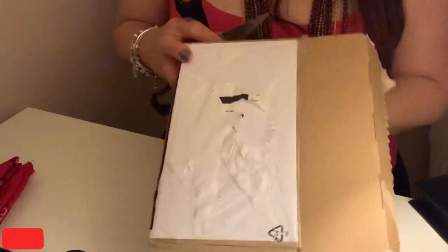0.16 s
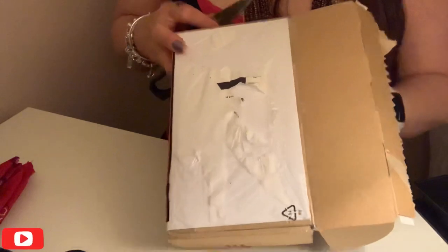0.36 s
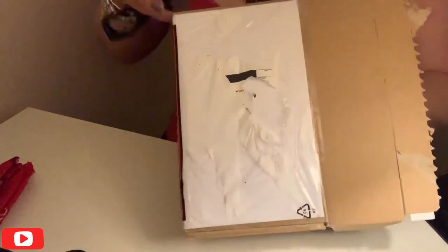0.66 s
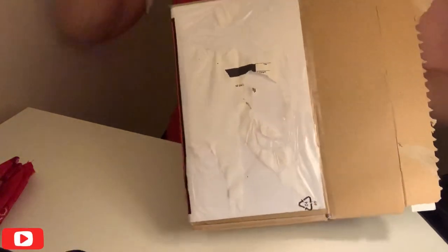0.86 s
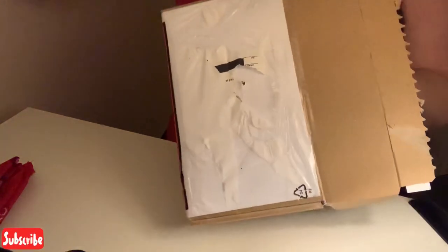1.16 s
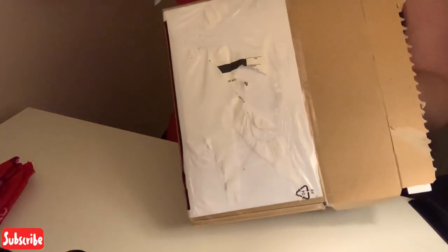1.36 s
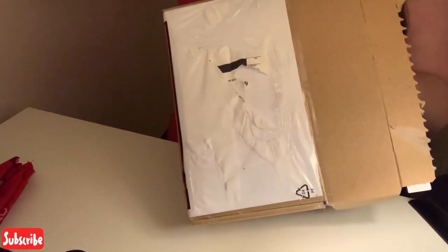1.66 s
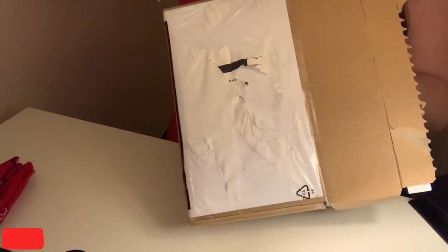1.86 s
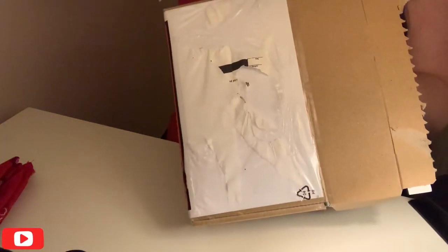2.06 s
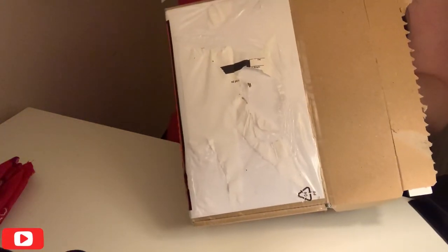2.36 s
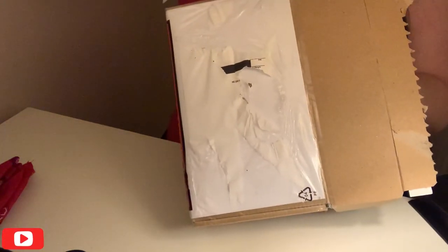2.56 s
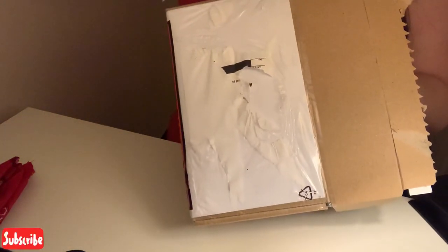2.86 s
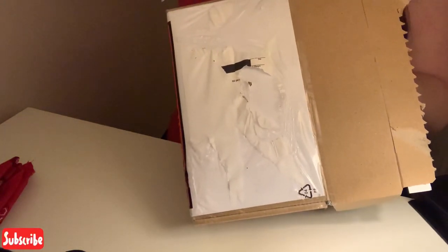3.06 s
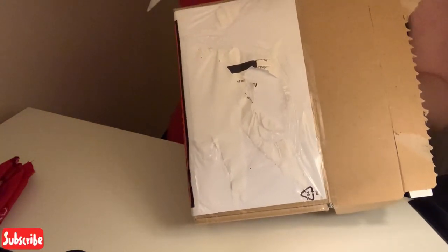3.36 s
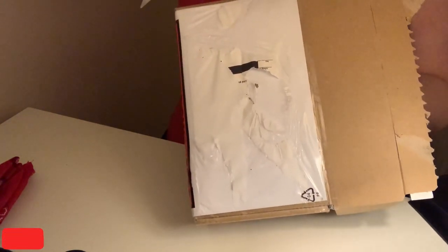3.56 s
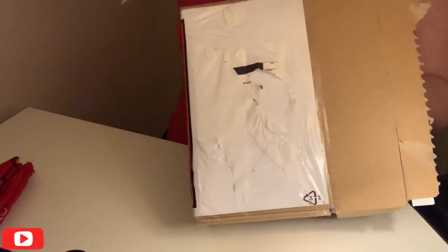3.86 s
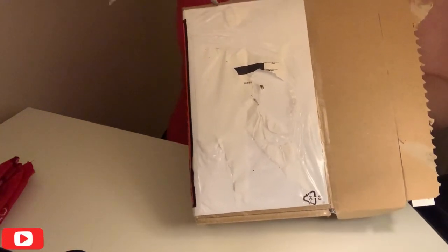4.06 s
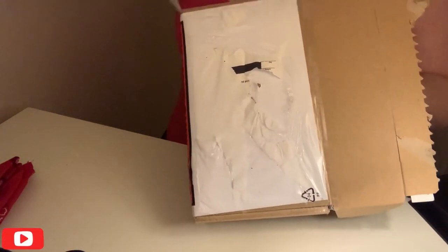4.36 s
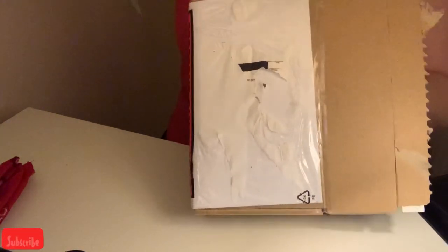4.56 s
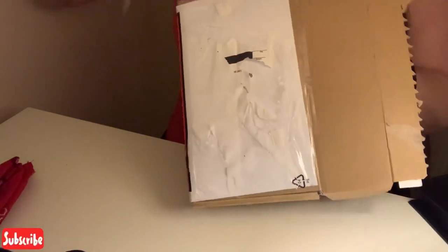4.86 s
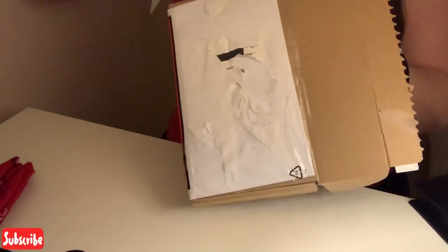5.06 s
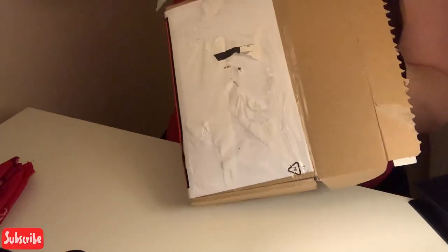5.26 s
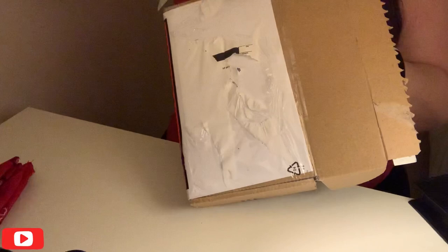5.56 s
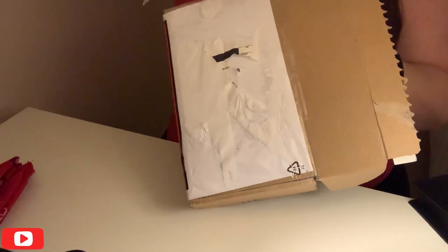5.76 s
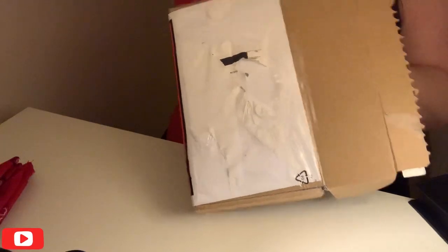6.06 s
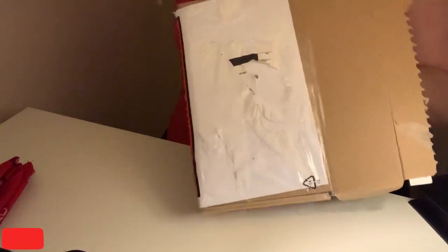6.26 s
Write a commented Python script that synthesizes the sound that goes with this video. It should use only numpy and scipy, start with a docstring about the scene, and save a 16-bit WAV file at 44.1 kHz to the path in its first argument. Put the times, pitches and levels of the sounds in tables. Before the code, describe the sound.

Close-up cardboard handling in a small, quiet room. A knock and dry scrapes open, the lid thuds softly, then the box is held nearly still with one tiny clink. A sudden hard tug brings deep hollow bumps and bright snaps, easing into a creaky run of ticks. After a short lull, a second pull thumps, rasps and crackles, then fades.

```python
"""A tight-fitting packet is worked loose in a torn-open cardboard mailer over a table in a small room.
First the box is turned: it knocks, scrapes, and its lid thuds; then it is held, almost still, with one clink.
A first hard pull bumps the walls and snaps creases; as it eases off, a fold creaks in a run of ticks.
After a new grip comes a second pull, which dies away. Slips and blows ring decaying sines; scrapes, crackle
and snaps are shaped noise. Two close microphones, a little to one side, hear it with the room and its air."""
import sys
import numpy as np
from scipy import signal
from scipy.fft import rfft, irfft, next_fast_len
from scipy.io import wavfile
from scipy.ndimage import uniform_filter1d, map_coordinates

SR = 44100
rng = np.random.default_rng(int(sys.argv[2]) if len(sys.argv) > 2 else 0)


def file_out(sig):
    """Save sig as 16-bit WAV at sys.argv[1]."""
    # one column per channel
    cols = np.atleast_2d(sig).T
    # limit, then scale
    lim = np.clip(cols, -1, 1)
    pcm = np.round(lim * 32767).astype(np.int16)
    wavfile.write(sys.argv[1], SR, pcm)


N = 281952
TIME = np.arange(N) / SR


def undb(db):
    """Decibels to gain."""
    return 10 ** (np.asarray(db) / 20)


def unit(x):
    """Scale to an rms of 1."""
    return x / np.sqrt(np.mean(x ** 2))


def unit_hit(x, size=220):
    """Scale a hit so that its loudest few milliseconds have an rms of 1."""
    return x / np.sqrt(uniform_filter1d(x ** 2, size).max())


def gains(points, hz):
    """Read (frequency [Hz], level [dB]) points as gains on a log-frequency axis."""
    f, db = np.transpose(points)
    return undb(np.interp(np.log(hz + 1), np.log(f), db))


def colour(x, points):
    """Causal filter with the given spectrum: folding the cepstrum forward makes it minimum-phase."""
    n = 2 * next_fast_len(x.shape[-1])
    cepstrum = irfft(np.log(gains(points, np.fft.rfftfreq(n, 1 / SR))))
    cepstrum[1:n // 2] *= 2
    cepstrum[n // 2 + 1:] = 0
    response = np.exp(rfft(cepstrum))
    return irfft(rfft(x, n) * response)[..., :x.shape[-1]]


def fade(t60, size):
    """Exponential decay that loses 60 dB in t60 seconds."""
    return np.exp(-np.log(1000) * TIME[:size] / t60)


def ring(modes, detune=1, size=22050):
    """One decaying sine for each mode, as rows; neighbouring modes swing opposite ways."""
    hz, db, t60 = np.transpose(modes)[:, :, None]
    held_t60 = np.minimum(t60, .26)  # no mode rings longer than this
    sign = (-1) ** np.arange(len(modes))[:, None]
    swing = np.sin(2 * np.pi * hz * detune * TIME[:size])
    return sign * undb(db) * fade(held_t60, size) * swing


def convolve(x, response):
    """Pass a sound through an impulse response."""
    return signal.fftconvolve(x, response)[:N]


def add(track, s, sound):
    """Mix a sound into a track at a time."""
    start = max(int(s * SR), 0)
    track[start:start + len(sound)] += sound[:N - start]


def grains(rate, spread_db):
    """Randomly timed impulses, many small and a few large."""
    hits = rng.random(N) < rate / SR
    return hits * undb(spread_db * np.minimum(rng.standard_exponential(N), np.pi))


def steady(x, seconds):
    """Even out the slow swells of a texture and keep its grain."""
    local_power = np.abs(uniform_filter1d(x ** 2, int(seconds * SR)))
    floor = np.mean(x ** 2) / 10 ** 2  # keeps silent gaps from being blown up
    return x / np.sqrt(local_power + floor)


def diffuse(size, spacing_s=0.0013):
    """Noise from all sides at two microphones: alike in the bass, unrelated in the treble."""
    likeness = np.sinc(2 * spacing_s * np.fft.rfftfreq(size, 1 / SR)) * .9
    shares = np.sqrt([(1 + likeness) / 2, (1 - likeness) / 2])
    mid, side = rfft(rng.standard_normal((2, size))) * shares
    return irfft([mid + side, mid - side], size)


def radiate(x, corner_hz=58):
    """An open box pushes almost no air below its lowest mode."""
    return signal.sosfilt(signal.butter(4, corner_hz, "high", fs=SR, output="sos"), x)


def burst(noise, decay_s):
    """A short spray of breaking fibres: fading noise, flattened to an even spectrum and faded again."""
    spectrum = rfft(noise * fade(decay_s, len(noise)))
    return irfft(spectrum / np.abs(spectrum)) * fade(2 * decay_s, len(noise))


# colour of the still air: (frequency [Hz], relative density [dB])
AIR = [(15, -38), (25, -8.5), (64, 2.5), (137, -5.5), (641, -18.5), (911, -18.5), (2480, -34.5),
       (5430, -37), (8360, -33), (9570, -44.5), (11300, -30.5), (16000, -71)]
AIR_DB = -66


def still_air():
    """The quiet noise floor of the room, arriving from all sides."""
    return undb(AIR_DB) * unit(colour(diffuse(N), AIR))


# room sound against direct sound: (frequency [Hz], level [dB])
ROOM = [(60, -18.5), (200, -13), (400, -7.5), (800, -6), (3000, 0.5), (5500, -4.5), (8000, -8),
        (16000, -12.5)]


def room(x, t60=0.22, build_s=0.00043, size=22050):
    """Dense reflections from the table and the near walls, built up quickly and dying away."""
    onset = 1 - np.exp(-(TIME[:size] / build_s) ** 2)
    tail = diffuse(size) * fade(t60, size) * onset
    tail = colour(unit(tail) / np.sqrt(size), ROOM)
    return np.array([convolve(x, side) for side in tail])


def arrive(x, edge_hz=1500):
    """The whole box radiates lows from nearly ahead; highs leave its open side and reach the left later."""
    hz = np.fft.rfftfreq(N, 1 / SR)
    highs = 1 - 1 / (1 + (hz / edge_hz) ** 4)
    lag_s = .00005 + .000217 * highs
    left = irfft(rfft(x) * np.exp(-2j * np.pi * hz * lag_s), N)
    return np.array([left, x])


# colour of the clink: (frequency [Hz], relative density [dB])
CLINK = [(1000, -23), (3500, -29), (5800, -9), (7000, -2.5), (8300, 2), (9800, -3), (11200, -5),
         (13000, -15), (16000, -25)]
CLINK_S, CLINK_DB = 1.727, -39


def clink(size=2048):
    """A thin, dry tick, as of a small hard object being touched: one coloured burst of noise."""
    out = np.zeros(N)
    tick = colour(burst(rng.standard_normal(size), decay_s=0.036), CLINK)
    add(out, CLINK_S, undb(CLINK_DB) * unit_hit(tick))
    return out


# soft, deep thuds of the wide lid: (time [s], level [dB])
FLEXES = [(0.477, -30.5), (0.633, -37)]
FLEX_HZ, FLEX_T60_S = 71.6, 0.22


def flexes(size=22050):
    """The lid flexes as the box is turned: one low, decaying sine for each thud."""
    out = np.zeros(N)
    swing = np.sin(2 * np.pi * FLEX_HZ * TIME[:size]) * fade(FLEX_T60_S, size)
    for s, db in FLEXES:
        add(out, s, undb(db) * unit_hit(swing))
    return out


# slips of the creaking fold: time [s]
CREAKS = [4.776, 4.802, 4.822, 4.838, 4.859, 4.879, 4.905, 4.948, 4.976, 5.007, 5.034]
# modes of the creaking fold: (frequency [Hz], level [dB], t60 before the cap in ring() [s])
FOLD = [(314, -5, 0.28), (374.6, -1.5, 0.18), (408, 14, 0.037), (532, -5.5, 0.18), (617, -3, 0.053),
        (770, 0, 0.041), (967, 11, 0.02), (1220, 7.5, 0.021), (1680, 8.5, 0.0087), (1870, -21, 0.069),
        (2190, -13, 0.025), (2660, -12, 0.011), (3110, -7, 0.013), (3900, -17, 0.008), (4630, -12, 0.026)]
# level at full strain, how far below it the first slip starts [dB]; time constant of the build-up [s]
CREAK_DB, CREAK_SLACK_DB, CREAK_BUILD_S = -36, -9.5, 0.038


def creak():
    """A strained fold slips in a run of ticks on the same panel, louder as the strain builds."""
    out = np.zeros(N)
    for s, chance in zip(CREAKS, rng.standard_normal(len(CREAKS))):
        slack = np.exp((CREAKS[0] - s) / CREAK_BUILD_S)
        db = CREAK_DB + CREAK_SLACK_DB * slack
        tick = radiate(ring(FOLD, detune=1 + 0.044 * chance).sum(axis=0), corner_hz=201)
        add(out, s, undb(db) * unit_hit(tick))
    return out


# snaps of creases and edges: (time [s], bright snap level [dB], dull crack level [dB], decay setting [s])
SNAPS = [(0.0094, -50.5, -30.5, 0.019), (0.2852, -59, -46.5, .05), (0.4293, -50, -46, .034),
         (0.474, -49, -46, 0.046), (0.54, -50, -45.5, 0.05), (0.6032, -47, -54, 0.04),
         (0.613, -42, -39, 0.13), (0.8189, -47.5, -42.5, 0.027), (0.8505, -48.5, -69, .05),
         (1.0842, -80, -47, 0.011), (1.23, -56.5, -63, .038), (1.6035, -50, -59.5, 0.025),
         (3.1529, -30.5, -43, .05), (3.1665, -33.5, -34, 0.026), (3.3544, -53.5, -74, 0.03),
         (3.4644, -41, -44, 0.019), (3.496, -43.5, -45.5, 0.057), (3.5974, -47.5, -49.5, .015),
         (3.8026, -39, -47, .023), (3.8366, -31.5, -48, .014), (3.8512, -25, -48, 0.019),
         (3.893, -35, -39, .04), (4.0085, -35, -53, 0.022), (4.0807, -40, -39.5, 0.017),
         (4.2325, -31.5, -48.5, 0.031), (4.2418, -33, -31.5, .03), (4.2515, -30, -41, .02),
         (4.2828, -30, -53, 0.015), (4.301, -33.5, -50.5, .027), (4.4044, -34, -41, .06),
         (4.4149, -19, -20.5, 0.017), (4.635, -47, -49.5, 0.065), (4.6667, -46, -65, 0.018),
         (5.1416, -55.5, -61.5, 0.056), (5.2911, -59, -61.5, 0.028), (5.591, -40.5, -44.5, .034),
         (5.6012, -46, -47, 0.019), (5.638, -42, -46, 0.043), (5.664, -35.5, -32.5, 0.016),
         (5.7175, -34, -36, 0.012), (5.7862, -35.5, -34.5, .023), (5.8134, -30, -33, 0.041),
         (5.877, -35, -45, 0.018), (6.064, -32, -49, 0.058), (6.0714, -22, -37, 0.052),
         (6.1938, -34, -34, .025)]
# colours of breaking fibres and of cracking board: (frequency [Hz], relative density [dB])
SNAP = [(500, -14), (2500, -19.5), (4500, 0), (6000, 2), (7700, 3.5), (9500, 1.5), (11000, 2),
        (13000, -3.5), (16000, -17)]
CRACK = [(150, -7), (400, -4.5), (900, 0.5), (1300, -1), (2300, -5.5), (3600, -10.5), (6000, -10),
         (16000, -36)]
CRACK_LINGER = 1.8  # the crack's decay setting, as a multiple of the snap's


def snaps(size=4096):
    """A crease lets go: a bright burst of breaking fibres over a duller crack of the board."""
    out = np.zeros(N)
    noises = rng.standard_normal((len(SNAPS), 2, size))
    for (s, snap_db, crack_db, decay_s), noise in zip(SNAPS, noises):
        snap = unit_hit(colour(burst(noise[0], decay_s), SNAP))
        crack = unit_hit(colour(burst(noise[1], CRACK_LINGER * decay_s), CRACK))
        add(out, s, undb(snap_db) * snap + undb(crack_db) * crack)
    return out


# bumps of the walls: (time [s], level [dB], pitch driven most [Hz], hard knock relative to level [dB])
BUMPS = [(0.01, -22.5, 298, -8), (0.819, -38, 310, -14), (1.095, -40, 328, -10.5), (1.241, -45, 273, -23),
         (2.014, -45, 324, -19), (3.165, -16, 111, -22), (3.451, -28, 186, -23), (3.675, -26, 350, -38),
         (3.83, -29, 110, -33), (3.891, -23, 98, -38), (4.266, -14, 89.3, -17.5), (4.284, -7.5, 102, -21),
         (4.416, -24, 181, -19.5), (5.599, -18.5, 120, -23), (5.66, -12.5, 136, -17.5),
         (5.827, -13.5, 169, -35), (5.876, -20, 169, -35), (5.91, -21, 190, -38), (5.991, -12, 182, -30),
         (6.042, -18, 186, -6.5)]
# modes of the box, also shaken by the slides: (frequency [Hz], level [dB], t60 [s])
BOX = [(83.8, -4.5, 0.23), (93.3, 3, 0.18), (135.6, -5, 0.21), (174, -2.5, 0.17), (202.5, 0.5, 0.15),
       (277.5, -1, 0.15), (303, 0.5, 0.16), (336.5, 3.5, 0.07), (383.5, -0.5, 0.12), (421, -7.5, 0.23),
       (521.8, -4.5, 0.075), (650.6, -17.5, 0.046), (726, -14, 0.024), (817, -8, 0.035), (863, -10.5, 0.05),
       (1000, -14, 0.018), (1140, -11.5, 0.03)]
KNOCK_HZ = 600  # a hard knock rings the modes above this


def bumps(focus=1.16):
    """A soft shove booms the box, a hard knock rings its stiff panels; the grip detunes it a little each time."""
    out, mode_hz = np.zeros(N), np.array(BOX)[:, 0]
    for (s, db, hz, knock_db), chance in zip(BUMPS, rng.standard_normal(len(BUMPS))):
        modes = radiate(ring(BOX, detune=1 + 0.019 * chance))
        drive = 1 / np.hypot(1, focus * (mode_hz / hz - hz / mode_hz))  # strongest near the driven pitch
        shove = unit_hit(drive @ modes)
        knock = unit_hit(modes[mode_hz > KNOCK_HZ].sum(axis=0))
        add(out, s, undb(db) * (shove + undb(knock_db) * knock))
    return out


# patches of resonance: spread [dB], width [Hz], life [s]
PATCH_DB, PATCH_HZ, PATCH_S = 3.5, 350, 0.03


def patchy(x, size=512):
    """The colour shifts at random as the point of contact travels over the board."""
    hz, t, spectra = signal.stft(x, SR, nperseg=size)
    places = np.meshgrid(hz / PATCH_HZ, t / PATCH_S, indexing="ij")
    shifts = map_coordinates(rng.standard_normal((size, size)), places, mode="mirror")
    gain = unit(undb(PATCH_DB * shifts))
    return signal.istft(spectra * gain, SR, nperseg=size)[1][:N]


# slides of card on card: (start time [s], length [s], low boom level [dB], panel rumble level [dB],
# scrape level [dB], fibre crackle level [dB], swell from start to end [dB])
SLIDES = [(0.008, .04, -37, -44, -38.5, -45, -12), (0.065, .085, -62, -46, -37, -44, 0),
          (0.174, .39, -56, -52.5, -52, -58.5, -2), (0.604, .035, -46.5, -45.5, -41.5, -47, -2.5),
          (0.718, 0.18, -54, -57.5, -55.5, -59, -3.5), (0.923, 0.36, -55.5, -58, -67, -70.5, 2.5),
          (1.5, .8, -72.5, -78.5, -83.5, -86, -2), (2.546, 0.67, -64.5, -61.5, -75.5, -102, 8.5),
          (2.595, 0.048, -68, -59, -67.5, -75, -2), (3.142, .02, -43, -33, -41.5, -44, 8),
          (3.169, .048, -20.5, -28, -65, -46, -13.5), (3.449, .055, -38, -40, -50, -54.5, 2.5),
          (3.606, .16, -37.5, -39.5, -48.5, -53.5, -0.5), (3.794, .11, -27, -31.5, -41.5, -45, 0),
          (4.037, .06, -37.5, -36, -49, -47.5, -7.5), (4.177, .06, -53.5, -51, -54.5, -56.5, 8.5),
          (4.245, .066, -20, -27, -34.5, -35, -1), (4.306, 0.022, -18.5, -42, -49, -43, -1.5),
          (4.432, 0.073, -43.5, -48.5, -48.5, -47.5, -6), (4.569, 0.21, -55, -55.5, -57.5, -56, -6),
          (4.767, 0.26, -52.5, -56.5, -64.5, -66.5, -4), (5.42, .08, -64, -66, -66.5, -64, 5.5),
          (5.509, 0.1, -52, -48.5, -62.5, -78, -2), (5.6, 0.19, -37, -40.5, -52.5, -54.5, -5.5),
          (5.797, .085, -29.5, -29.5, -38, -40.5, -0.5), (5.938, .13, -32, -23, -34, -40.5, 13),
          (6.078, 0.023, -26, -27, -57, -35.5, -7), (6.156, .031, -38.5, -38, -54.5, -39, 0.5),
          (6.24, 0.18, -66, -62, -64.5, -67, -8)]
GRAB_S = 0.047  # the card creeps before it slides: time to rise by 60 dB


def effort(levels_db, stop_s):
    """Gain of one layer over all slides: each creeps in, swells or slackens, then dies away (t60 stop_s)."""
    t, power = TIME[::32], 0
    for (start, length, *_, swell_db), db in zip(SLIDES, levels_db):
        progress = np.clip((t - start) / length, 0, 1)
        held = undb(db + swell_db * (progress - .5))
        before = np.maximum(start - t, 0) / GRAB_S
        after = np.maximum(t - start - length, 0) / stop_s
        power = power + (held * np.exp(-np.log(1000) * (before + after))) ** 2
    return np.interp(TIME, t, np.sqrt(power))


# colours of the jerky rasp, the light glide and the fibre crackle: (frequency [Hz], relative density [dB])
SCRAPE = [(200, -15), (400, 6), (620, -10), (830, 7), (1050, -5.5), (1400, -16), (1700, 0.5), (2600, -29.5),
          (3300, -21.5), (4800, -14), (8000, -26), (16000, -33)]
GLIDE = [(200, -10.5), (450, 4.5), (850, -0.5), (1400, -1.5), (2050, 1.5), (2500, -7), (3150, -10),
         (3700, -12), (4800, -13), (8000, -17), (16000, -48)]
CRACKLE = [(500, -35.5), (2500, -9), (3800, -5), (4800, 0.5), (6000, -9.5), (7500, 0), (9000, 3),
           (11000, -5), (13000, -3.5), (15000, -23.5), (16500, 2)]
LOW_MODE_HZ = 150  # box modes below this boom as the cavity, the others rumble as panels
# how each layer dies away after a slide: t60 [s]
CAVITY_STOP_S, PANEL_STOP_S, SCRAPE_STOP_S, CRACKLE_STOP_S = 0.33, 0.24, 0.23, 0.29
STRAY_PER_S, STRAY_DB = 15, -11  # stray breaking fibres: average rate, level against the crackle


def sliding():
    """Stick-slip: each slip shakes the box and lets out a short rasp, while fibres crackle."""
    _, _, boom_db, rumble_db, scrape_db, crackle_db, _ = np.transpose(SLIDES)
    booming, shaking = effort(boom_db, CAVITY_STOP_S), effort(rumble_db, PANEL_STOP_S)
    scraping, crackling = effort(scrape_db, SCRAPE_STOP_S), effort(crackle_db, CRACKLE_STOP_S)

    slips = grains(rate=200, spread_db=3.5)
    modes, low = radiate(ring(BOX)), np.array(BOX)[:, 0] < LOW_MODE_HZ
    cavity = steady(convolve(slips, modes[low].sum(axis=0)), seconds=.034)
    panels = steady(convolve(slips, modes[~low].sum(axis=0)), seconds=.034)
    body = radiate(booming * cavity + shaking * panels)

    # a light touch glides evenly; a tight grip, which shakes the box, rasps in jerks
    shake_db = 20 * np.log10(np.hypot(booming, shaking) / scraping)
    grip = np.clip(.25 + shake_db / 28, .1, .9)
    jerks = unit(convolve(slips, fade(t60=0.022, size=2000)))
    rasp = steady(colour(jerks * rng.standard_normal(N), SCRAPE), seconds=0.058)
    coarse = grains(rate=4500, spread_db=3.5) * rng.choice([-1, 1], N)
    glide = unit(colour(coarse, GLIDE))
    scrape = np.sqrt(grip) * rasp + np.sqrt(1 - grip) * glide

    fine = grains(rate=4500, spread_db=3.5) * rng.choice([-1, 1], N)
    crackle = steady(colour((grip * jerks + 1 - grip) * fine, CRACKLE), seconds=0.06)
    stray_swells = convolve(grains(STRAY_PER_S, spread_db=-1.5), fade(t60=0.012, size=2000))
    strays = unit(colour(stray_swells * rng.standard_normal(N), SNAP))
    crackle = crackle + undb(STRAY_DB) * strays
    return body + patchy(scraping * scrape + crackling * crackle)


def scene():
    """The handling, its reflections and the still air of the room."""
    handling = clink() + flexes() + creak() + snaps() + bumps() + sliding()
    return still_air() + room(handling) + arrive(handling)


# left minus right: (frequency [Hz], level difference [dB])
BALANCE_DB = [(100, .4), (300, .9), (600, 2.8), (1300, 2.8), (2500, 1.2), (5500, 1.8), (8000, 0),
              (16000, 0)]
TOP_HZ = 16200


def record(dry):
    """The left microphone hears the middle range a little louder; the top is cut steeply."""
    half = gains(BALANCE_DB, np.fft.rfftfreq(N, 1 / SR)) ** .5
    heard = irfft(rfft(dry) * np.array([half, 1 / half]), N)
    return signal.sosfilt(signal.ellip(10, .2, 80, TOP_HZ, fs=SR, output="sos"), heard)


dry = scene()
out = record(dry)
file_out(out)
```